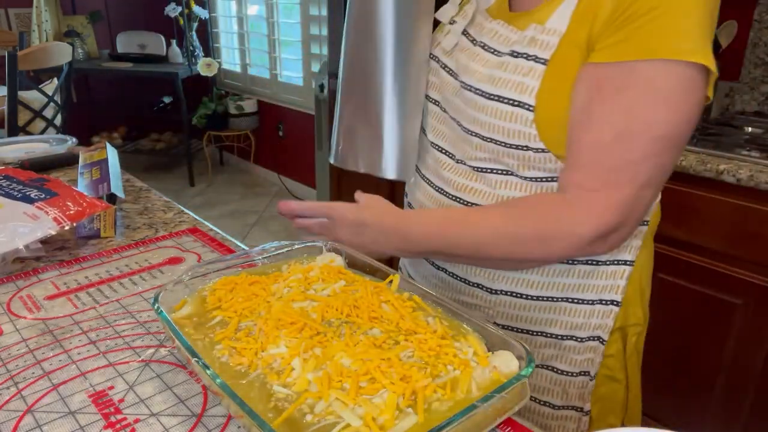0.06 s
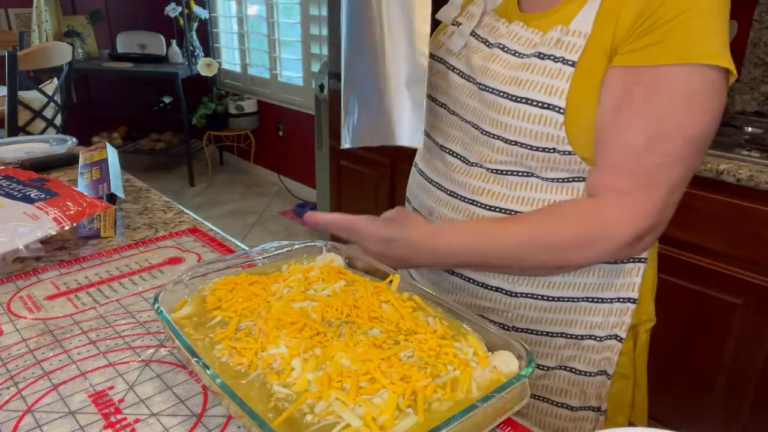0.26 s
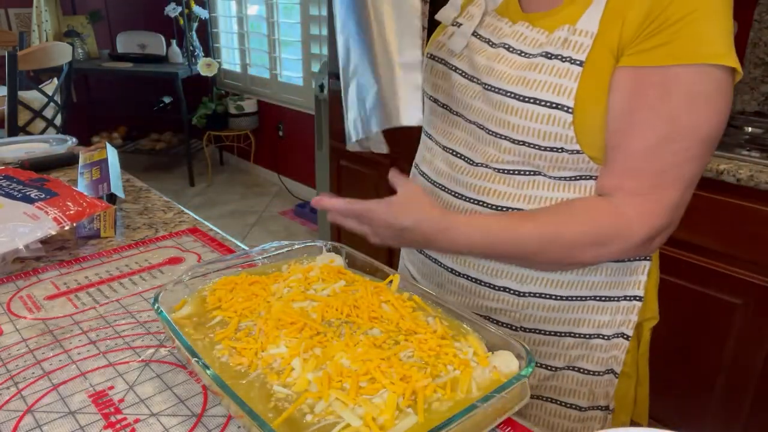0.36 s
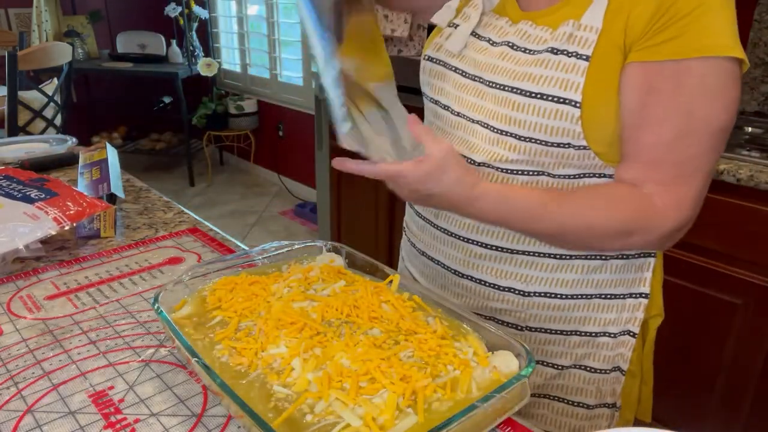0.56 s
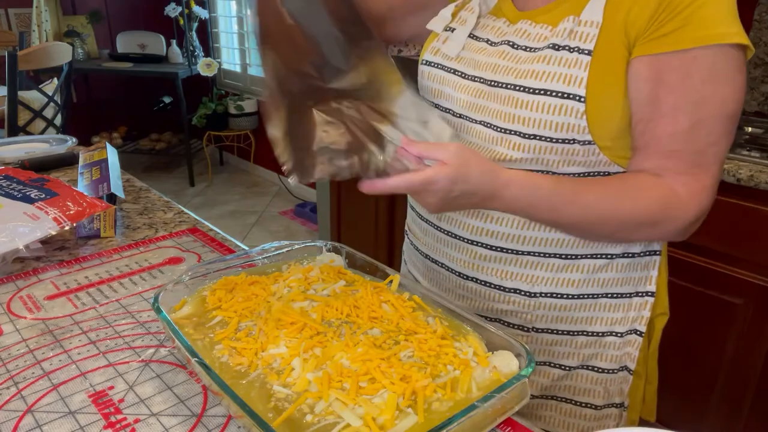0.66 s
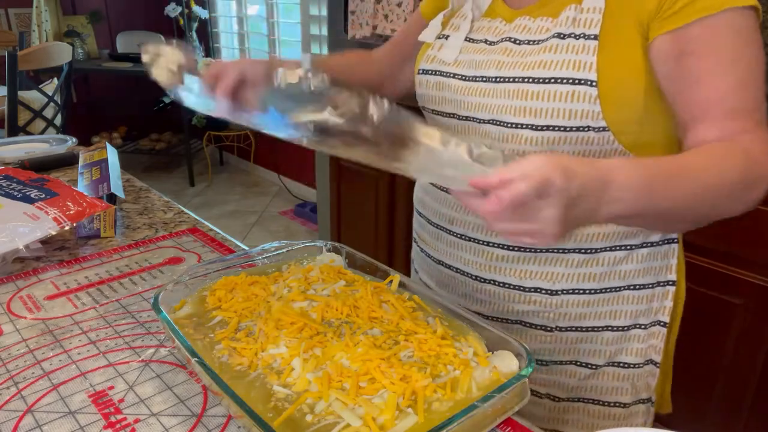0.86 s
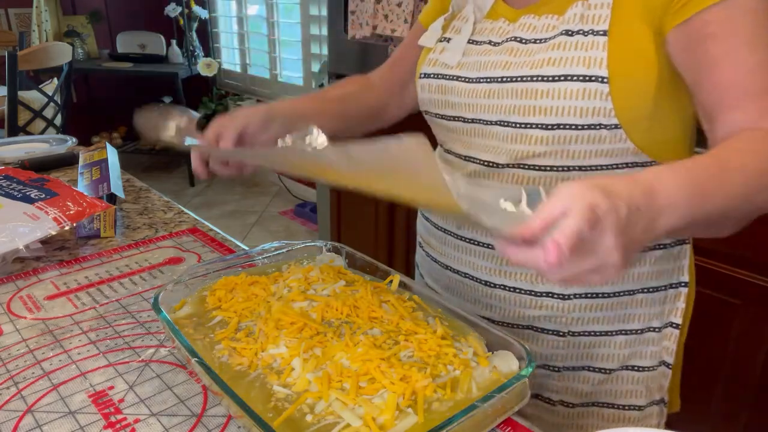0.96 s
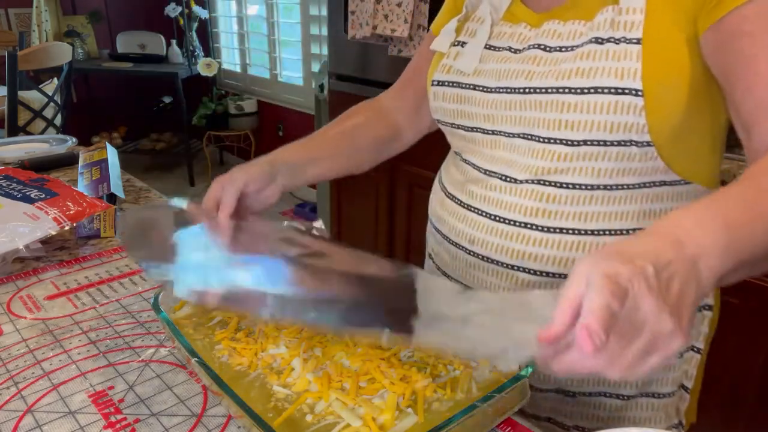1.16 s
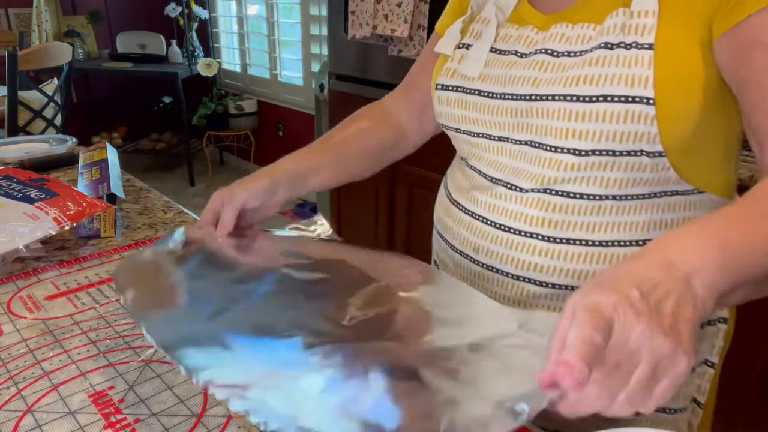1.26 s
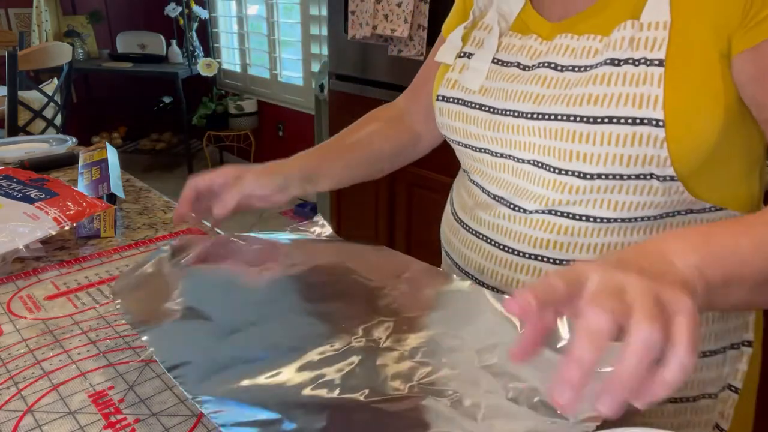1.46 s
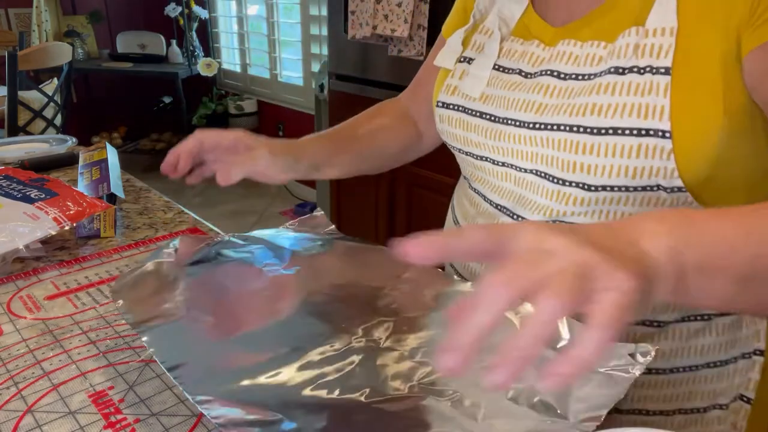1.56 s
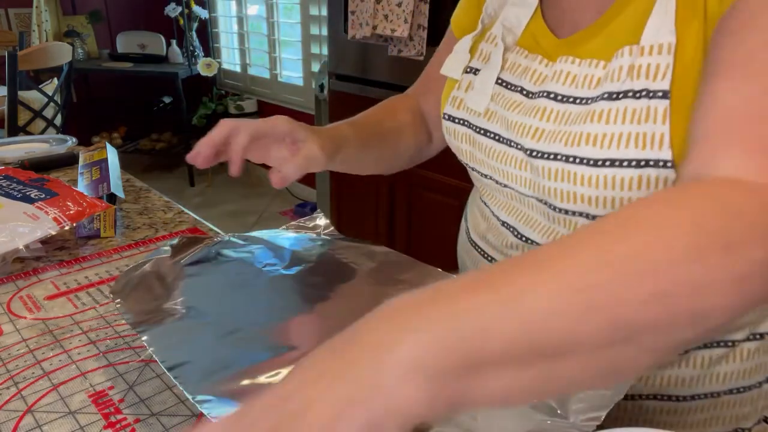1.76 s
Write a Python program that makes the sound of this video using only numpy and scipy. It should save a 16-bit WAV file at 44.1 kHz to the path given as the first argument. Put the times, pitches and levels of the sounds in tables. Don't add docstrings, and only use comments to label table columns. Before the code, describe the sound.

Crisp metallic foil crackling in a hard-walled kitchen, with one dull cabinet knock early on

```python
import sys
import numpy as np
from scipy import signal
from scipy.fft import rfft, irfft, next_fast_len
from scipy.io import wavfile
from scipy.ndimage import uniform_filter1d

SR = 44100
rng = np.random.default_rng(int(sys.argv[2]) if len(sys.argv) > 2 else 0)


def invert_db(level):
    return 10 ** (np.asarray(level, dtype=float) / 20)


def unload_audio(sound):
    columns = np.transpose(np.atleast_2d(sound))
    steps = np.round(np.clip(columns, -1, 1) * 32767)
    wavfile.write(sys.argv[1], SR, steps.astype(np.int16))


N = 79380


def evened(x):
    return x / np.sqrt(np.mean(x ** 2) + 1e-20)


def read(points, hz):
    f, value = np.transpose(points)
    return np.interp(np.log(hz + 1), np.log(f + 1), value)


def colour(x, gain):
    size = next_fast_len(x.shape[-1] + 4096)
    spectrum = rfft(x, size) * gain(np.fft.rfftfreq(size, 1 / SR))
    return irfft(spectrum, size)[..., :x.shape[-1]]


def resonance(hz, centre_hz, width_hz):
    return 1 / (1 + (2 * (hz - centre_hz) / width_hz) ** 2)


# pitch_hz, t60_s
KITCHEN_DECAY = [(200, 0.39), (700, 0.66), (2000, 0.48), (5000, 0.35), (9000, 0.25), (15000, 0.033)]


def room_tails(count):
    hz, t, bands = signal.stft(rng.standard_normal((count, SR // 2)), SR, nperseg=256)
    t60 = np.maximum(read(KITCHEN_DECAY, hz), 0.05)[:, None]
    tail = signal.istft(bands * invert_db(-60 * t / t60), SR, nperseg=256)[1]
    tail = tail * np.minimum(np.arange(tail.shape[1]) / (0.01 * SR), 1)
    return tail / np.linalg.norm(tail, axis=1, keepdims=True)


# pitch_hz, level_db (per Hz)
RUMBLE_COLOUR = [(30, -1.5), (65, -8.5), (195, -5), (312, -5.5), (480, -12.5), (1170, -27.5), (4500, -40),
                 (10000, -86)]
# pitch_hz, width_hz, level_db
DRONES = [(76.1, 7.5, -52), (131, 13, -50.5), (244.6, 42, -51.5), (1150, 12, -64.5)]
RUMBLE_DB = -43


def rumble():
    wash = colour(rng.standard_normal((2, N)), lambda hz: invert_db(read(RUMBLE_COLOUR, hz)))
    wash = invert_db(RUMBLE_DB) * evened(wash)
    for centre_hz, width_hz, level_db in DRONES:
        drone = colour(rng.standard_normal((2, N)), lambda hz: resonance(hz, centre_hz, width_hz))
        wash = wash + invert_db(level_db) * evened(drone)
    return wash


# pitch_hz, level_db, t60_s
CABINET_MODES = [(126, 0.5, .04), (204, -3.5, .03), (246, -2.5, 0.032), (380, 2, 0.037), (508, -9, 0.026),
                 (572, -7.5, 0.018), (726, -1.5, 0.031), (818, -6, 0.02), (957, -14, 0.026),
                 (1217, -12, 0.033)]
# start_s, level_db (against the first), low_edge_hz, high_edge_hz, judder_t60_s
BOUNCES = [
    (.234, -5.5, 152, 900, 0.11),
    (.258, -4, 228, 517, 0.061),
    (0.273, -2.5, 215, 466, 0.11),
    (.294, -2.5, 50, 260, 0.11),
    (.408, -11.5, 98, 785, 0.034),
    (0.414, -8, 60, 171, 0.13),
    (0.442, -5, 100, 260, 0.029),
]
KNOCK_S, KNOCK_DB, KNOCK_ROOM_DB, JUDDER_T60 = 0.2195, -27, -3, 0.13


def knock():
    t = np.arange(SR // 2) / SR
    ring = np.zeros(len(t))
    for hz, level_db, t60 in CABINET_MODES:
        ring = ring + invert_db(level_db - 60 * t / t60) * np.sin(2 * np.pi * hz * t)
    blows = np.zeros(N)
    for start_s, level_db, low_hz, high_hz, t60 in [(KNOCK_S, 0, 180, 3000, JUDDER_T60)] + BOUNCES:
        judder = rng.standard_normal(len(t)) * invert_db(-60 * t / t60) * np.minimum(t / 0.012, 1)
        judder = judder / np.linalg.norm(judder)
        band = signal.butter(2, [low_hz, high_hz], "band", fs=SR)
        judder = signal.lfilter(*band, judder)
        blows = blows + invert_db(KNOCK_DB + level_db) * np.pad(judder, (round(start_s * SR), N))[:N]
    near = signal.fftconvolve(blows, ring)[:N]
    far = signal.fftconvolve(near[None], room_tails(count=2), axes=1)[:, :N]
    return near + invert_db(KNOCK_ROOM_DB) * far


# peak_s, level_db, rise_s, length_s, brightness_db
SHEET_FLEXES = [(0.0, -46.5, .02, 0.052, -11), (0.057, -49.5, .03, .03, -9), (0.098, -57.5, .03, 0.026, -14.5),
                (0.152, -53, 0.0016, 0.0047, 9), (0.164, -62, .005, .01, 12), (0.122, -61.5, 0.018, 0.018, 12),
                (0.1693, -38.5, 0.0031, 0.01, 3.5), (0.179, -40, 0.012, 0.044, -6.5),
                (0.234, -44, 0.073, 0.048, -5.5), (0.296, -55, 0.039, 0.036, -10),
                (0.371, -49.5, 0.002, 0.014, 10), (0.39, -51.5, 0.04, 0.044, -10),
                (0.49, -63, 0.078, 0.059, -21),
                (0.542, -53, .003, .008, 6), (0.554, -38, 0.012, 0.06, -5.5), (0.595, -37.5, 0.028, 0.067, 1),
          (0.632, -35, 0.013, 0.013, 0), (0.665, -25.5, 0.029, 0.022, 4.5),
          (0.658, -26.5, 0.0017, 0.0011, 11), (0.673, -26, .0015, .002, 6), (0.698, -28.5, 0.043, 0.026, 3),
          (.7385, -24.5, 0.0038, 0.0065, 8), (0.745, -26, 0.0017, 0.005, 7.5),
          (0.75, -24, 0.0065, 0.032, 5), (0.777, -34, 0.0015, .003, 11), (0.779, -28, 0.0071, 0.035, 5.5),
          (0.824, -34.5, 0.03, 0.082, 2), (0.888, -36, 0.0089, 0.015, 4), (0.909, -38, 0.024, 0.11, -1),
          (0.972, -37.5, 0.0071, 0.025, 18), (1.021, -35.5, 0.046, 0.061, 1.5),
          (1.093, -40, 0.044, 0.018, 4), (1.125, -39.5, 0.004, 0.048, 7), (1.209, -34, 0.14, 0.021, 1.5),
          (1.236, -31.5, 0.011, 0.058, -2.5), (1.245, -36.5, 0.018, 0.054, 6),
          (1.291, -33.5, 0.016, 0.021, -5), (1.346, -27, 0.056, 0.043, 6), (1.38, -33.5, 0.038, 0.07, -5.5),
          (1.412, -36.5, 0.024, 0.024, 21.5), (1.489, -33, 0.0083, 0.012, -5), (1.498, -36, .008, 0.01, 4),
          (1.604, -65.5, 0.034, 0.069, -5)]
RISE_DB, START_DB_PER_S = 8.5, 2496
SAG_DB, RELEASE_DB_PER_S = 6.5, 508
DULLING_DB = 2


def flexing():
    t, power, weighted_db = np.arange(N) / SR, np.full(N, 1e-12), np.zeros(N)
    for peak, level_db, rise, length, bright_db in SHEET_FLEXES:
        age = np.maximum(t - peak, 0) / length
        fall_db = RISE_DB * np.maximum(peak - t, 0) / rise
        fall_db = fall_db + START_DB_PER_S * np.maximum(peak - rise - t, 0)
        fall_db = fall_db + SAG_DB * age
        fall_db = fall_db + RELEASE_DB_PER_S * np.maximum(t - peak - length, 0)
        flex = invert_db(level_db - np.minimum(fall_db, 200)) ** 2
        power = power + flex
        weighted_db = weighted_db + flex * (bright_db - DULLING_DB * (np.minimum(age, 1) - 0.5))
    return power, weighted_db / power


CLICKS_PER_S, CLICK_SPREAD_DB, CLUMP_DB, CLUMP_S = 9000, 3, 1.13, 0.0042


def buckling_clicks():
    clumps = evened(uniform_filter1d(rng.standard_normal(N), int(CLUMP_S * SR)))
    chance, size, sign = rng.random((N, 3)).T
    size_db = -CLICK_SPREAD_DB * np.maximum(np.log(size), -2.6)
    snaps = (chance < CLICKS_PER_S / SR) * np.sign(sign - 0.5)
    return evened(snaps * invert_db(CLUMP_DB * clumps + size_db))


# start_s, length_s, level_db, pitch_hz
BOWS = [
    (0.644, 0.023, -33.5, 3190),
    (1.064, 0.025, -43, 2900),
    (1.131, .015, -39, 4380),
    (1.217, 0.034, -43, 2880),
    (1.253, 0.031, -42, 2900),
    (1.335, 0.033, -39.5, 3090),
    (1.483, 0.012, -42.5, 3140),
]
BOW_WIDTH = 0.45


def bowing(clicks):
    t, bows = np.arange(N) / SR, np.zeros(N)
    for start, length, level_db, bow_hz in BOWS:
        swell = np.sin(np.pi * np.clip((t - start) / length, 0, 1))
        panel = evened(colour(clicks, lambda hz: resonance(hz, bow_hz, BOW_WIDTH * bow_hz)))
        bows = bows + invert_db(level_db) * swell * panel
    return bows


SHIMMER_DB, SHIMMER_T60 = 2, 0.024


def patch_shimmer():
    t = np.arange(6000) / SR
    ring = rng.standard_normal((2, 16, len(t))) * invert_db(-60 * t / SHIMMER_T60)
    ring = invert_db(SHIMMER_DB) * ring / np.linalg.norm(ring, axis=2, keepdims=True)
    ring[..., 0] += [np.ones(16), np.tile([1, -1], 8)]
    return ring


# pitch_hz, level_db
CLICK_COLOUR = [(250, -7.5), (700, -4.5), (1700, -0.5), (2900, 1), (6000, 0.5), (8500, -1.5), (12000, -8.5),
                (15500, -14)]
BRIGHT_HZ = 5560
BODY_HZ, BODY_SHARE = 2900, 0.7
KITCHEN_DB = -3


def foil():
    power, bright_db = flexing()
    clicks = buckling_clicks()
    high = colour(clicks, lambda hz: 1 / (1 + (BRIGHT_HZ / (hz + 1)) ** 2))
    low = colour(clicks, lambda hz: 1 / (1 + (hz / BODY_HZ) ** 4))
    tilted = clicks + (invert_db(bright_db) - 1) * high + (invert_db(-BODY_SHARE * bright_db) - 1) * low
    drive = np.sqrt(power) * tilted + bowing(clicks)
    patch = (rng.random(len(range(0, N, 400))) * 16).astype(int)
    active = np.eye(16)[patch].repeat(400, axis=0)[:N]
    share = uniform_filter1d(active, size=600, axis=0).T
    parts = drive * share ** 0.5
    near = signal.fftconvolve(parts[None], patch_shimmer(), axes=2)[..., :N]
    paths = room_tails(count=32).reshape(2, 16, -1)
    far = signal.fftconvolve(near, paths, axes=2)[..., :N]
    both = near.sum(axis=1) + invert_db(KITCHEN_DB) * far.sum(axis=1)
    return colour(both, lambda hz: invert_db(read(CLICK_COLOUR, hz)))


def scene():
    return rumble() + knock() + foil()


# pitch_hz, likeness (0-1)
PORT_LIKENESS = [(60, 0.96), (200, 0.95), (500, 0.06), (2000, 0.07), (4000, 0.12), (6500, 0.21), (8500, .8),
                 (15000, 0.9)]
# pitch_hz, phase_rad
PORT_LEAD = [(100, 0.45), (430, 0.03), (1300, -0.5), (2400, -1.5), (3450, 4.5)]
# pitch_hz, level_db
PORT_BALANCE = [(60, -0.7), (600, -2.5), (2500, -1.5), (6000, -1.2), (12000, 1)]
PORT_DELAY_S, PORT_TURN_RAD = 0.000182, -0.64


def two_ports(dry):
    def lead(hz):
        late = 2 * np.pi * hz * PORT_DELAY_S + PORT_TURN_RAD
        blend = np.clip((hz - 3450) / 1200, 0, 1)
        return (1 - blend) * read(PORT_LEAD, hz) + blend * late

    def likeness(hz):
        return np.clip(read(PORT_LIKENESS, hz), 0, 0.99)

    shared = colour(dry[0], lambda hz: likeness(hz) * np.exp(-1j * lead(hz)))
    unrelated = colour(dry[1], lambda hz: np.sqrt(1 - likeness(hz) ** 2))
    left = colour(dry[0], lambda hz: invert_db(read(PORT_BALANCE, hz) / 2))
    right = colour(shared + unrelated, lambda hz: invert_db(-read(PORT_BALANCE, hz) / 2))
    return np.array([left, right])


# pitch_hz, level_db (per Hz)
HISS_COLOUR = [(2000, -11), (7000, -2), (10000, -15.5), (14000, -28)]
HISS_DB = -71.5


def hiss():
    return invert_db(HISS_DB) * evened(colour(rng.standard_normal((2, N)), lambda hz: invert_db(read(HISS_COLOUR, hz))))


def low_pass(x):
    return signal.sosfilt(signal.butter(12, 15845, fs=SR, output="sos"), x)


LOW_HZ, EDGE_HZ = 50, 15840


def record(dry):
    ports = two_ports(dry) + hiss()
    mix = colour(ports, lambda hz: (hz < EDGE_HZ) / np.sqrt(1 + (LOW_HZ / (hz + 1)) ** 8))
    return low_pass(mix)


dry = scene()
out = record(dry)
unload_audio(out)
```